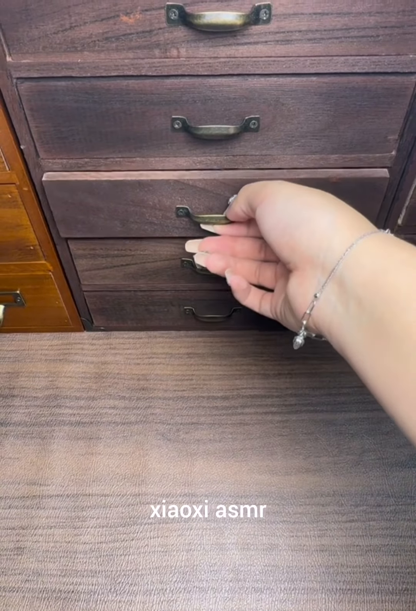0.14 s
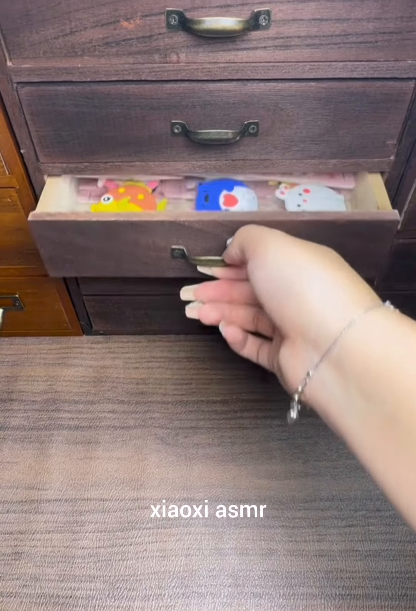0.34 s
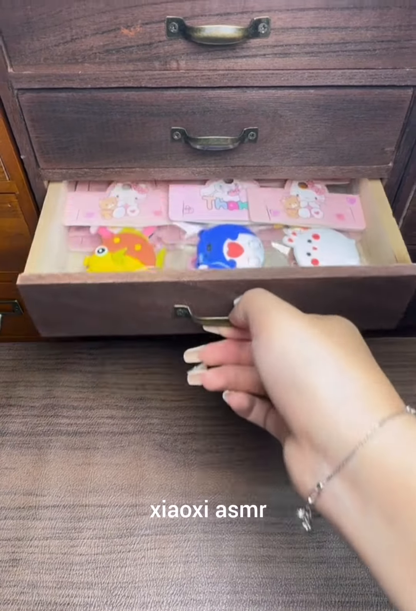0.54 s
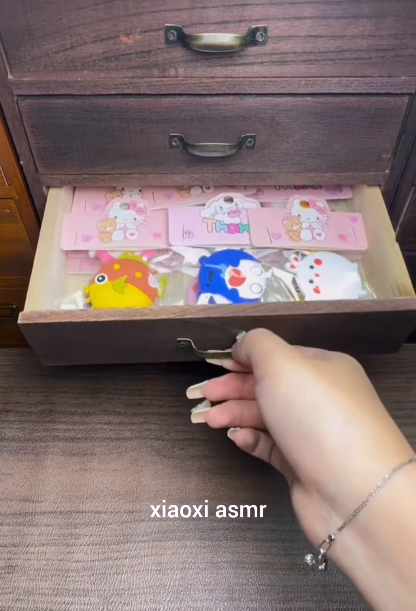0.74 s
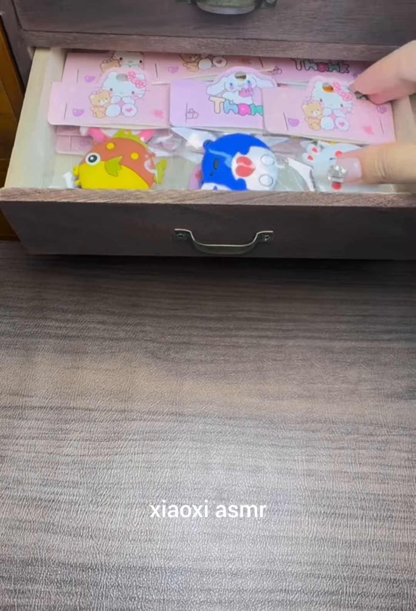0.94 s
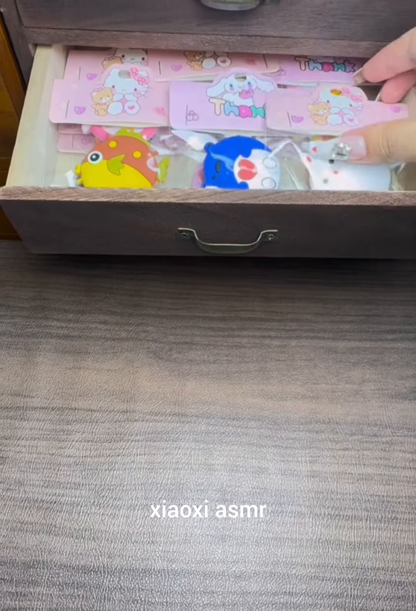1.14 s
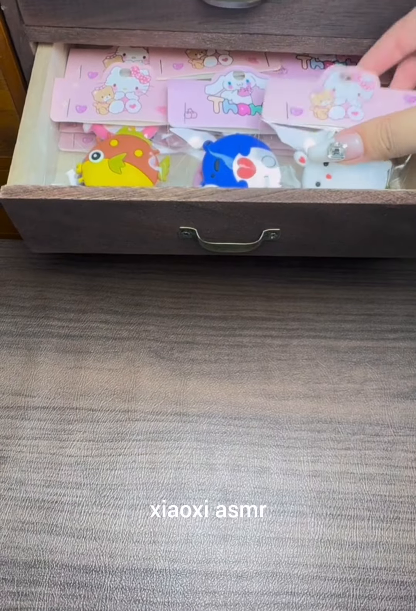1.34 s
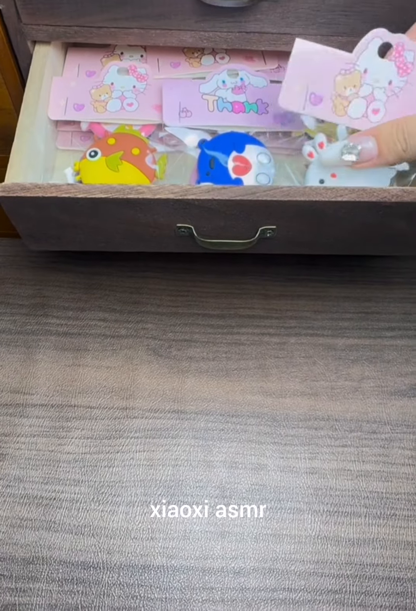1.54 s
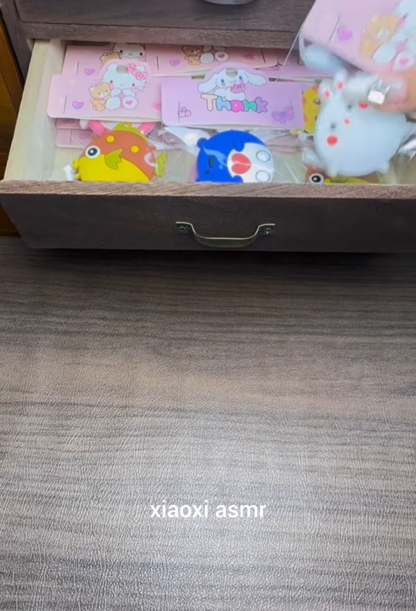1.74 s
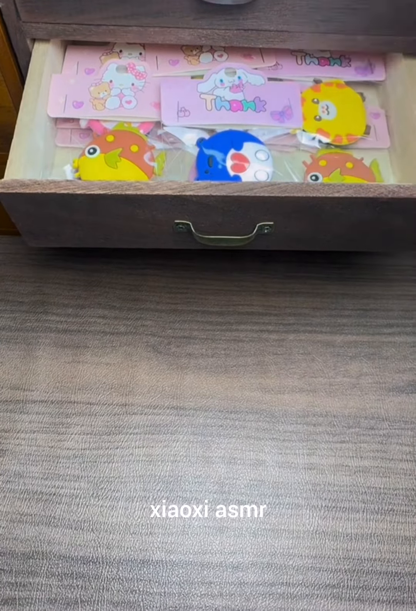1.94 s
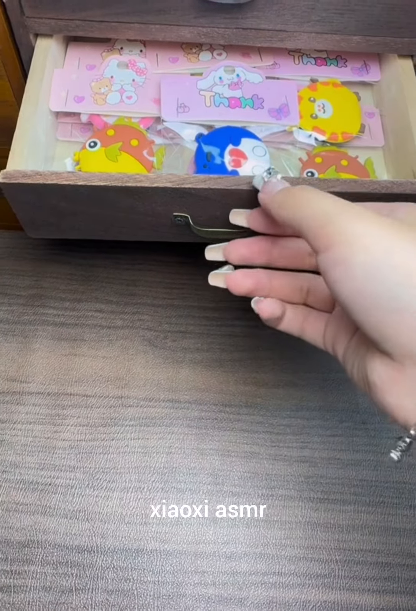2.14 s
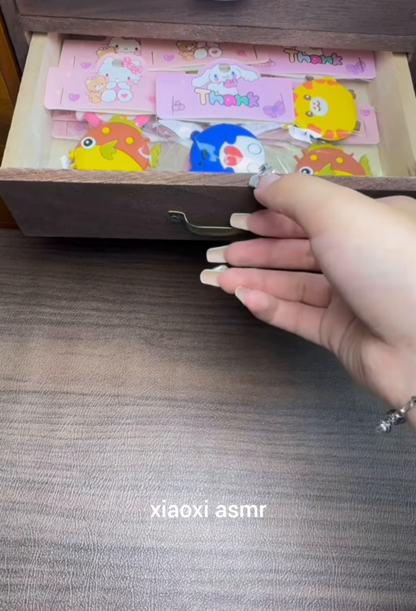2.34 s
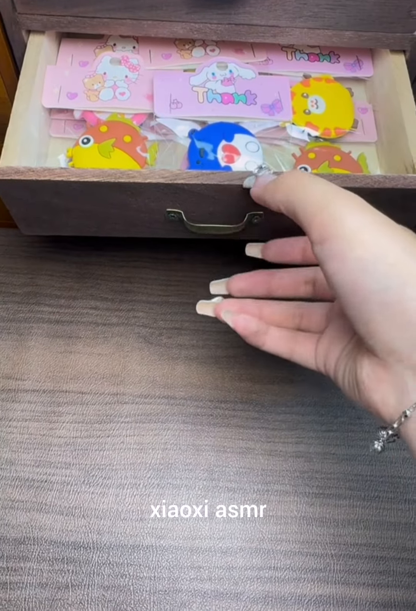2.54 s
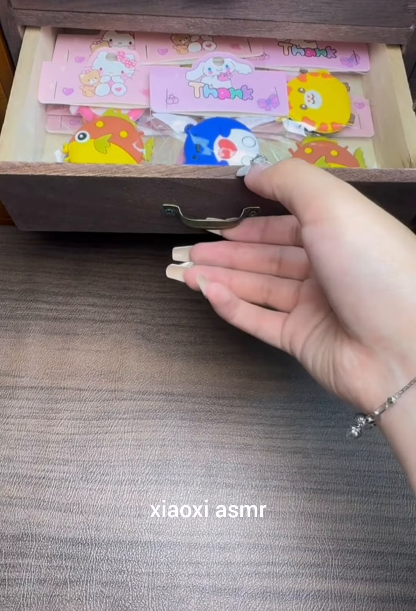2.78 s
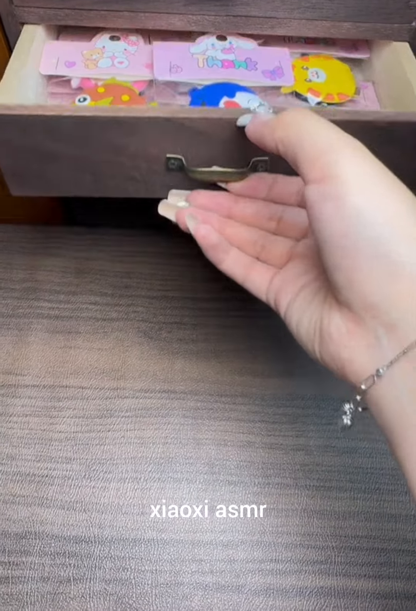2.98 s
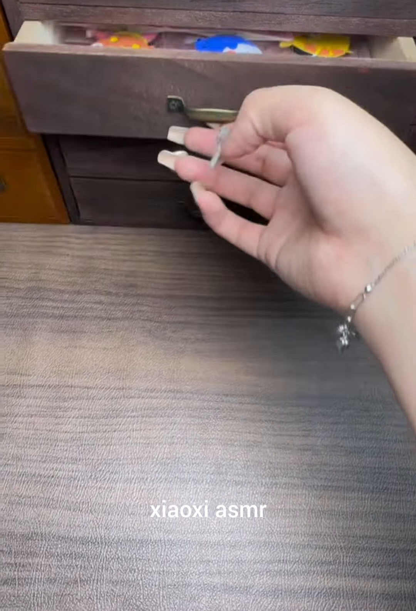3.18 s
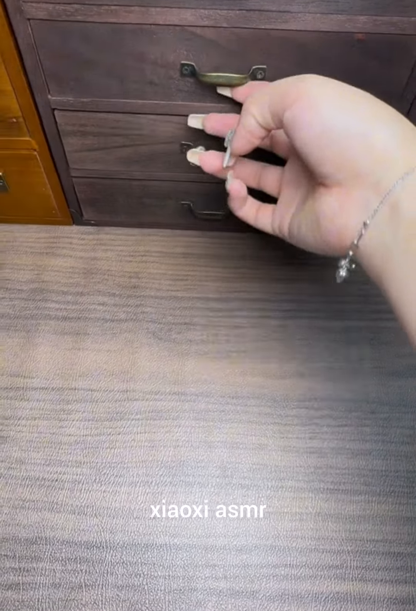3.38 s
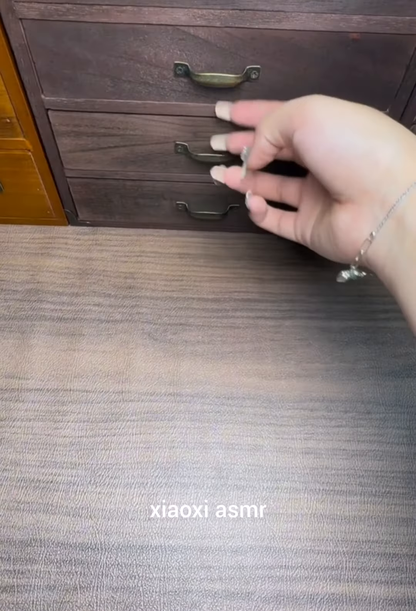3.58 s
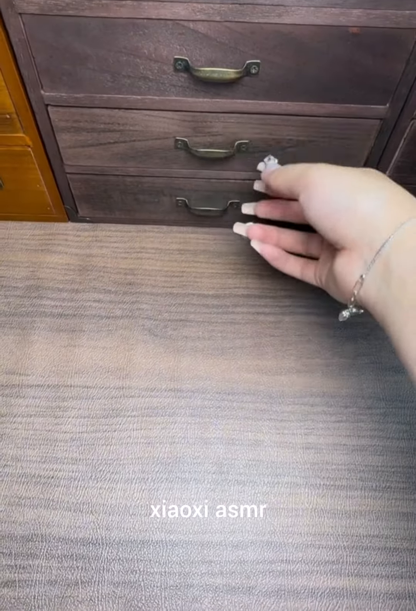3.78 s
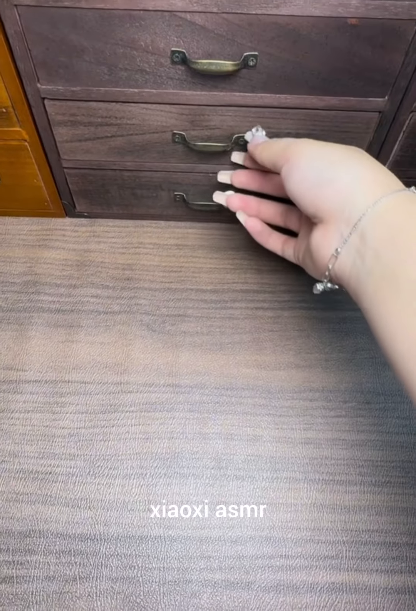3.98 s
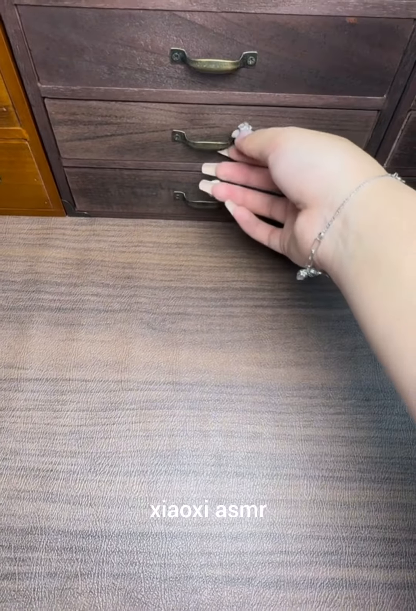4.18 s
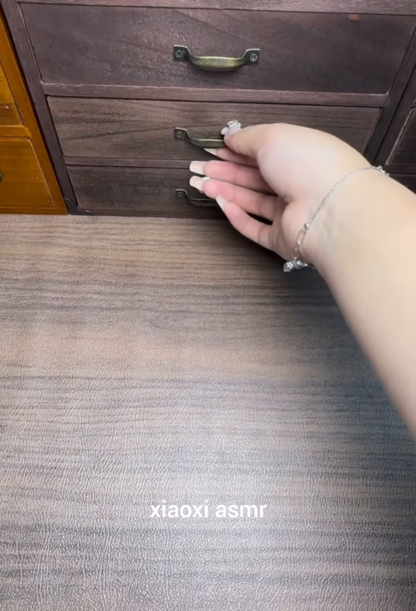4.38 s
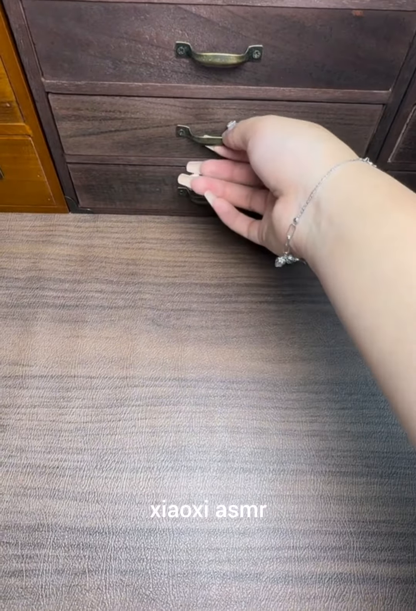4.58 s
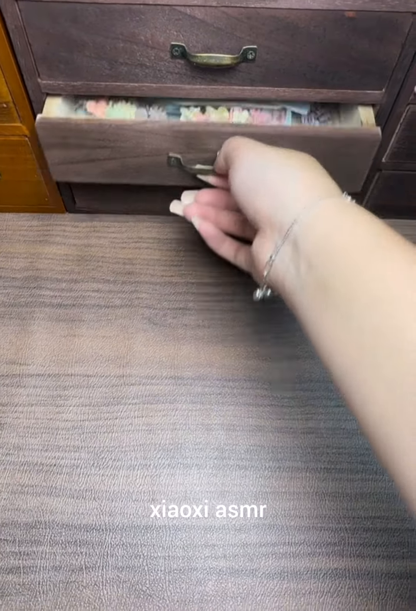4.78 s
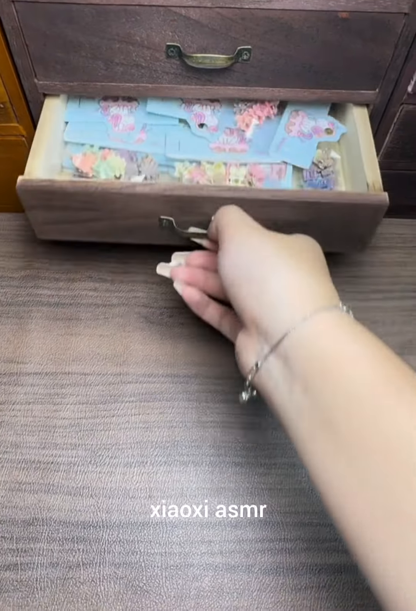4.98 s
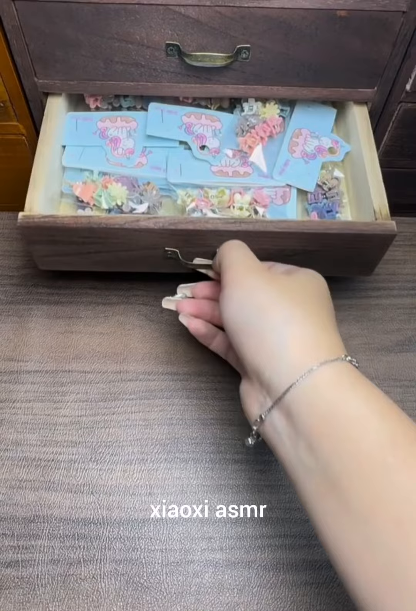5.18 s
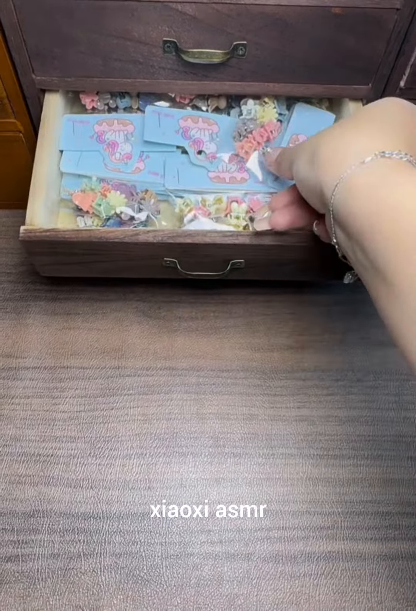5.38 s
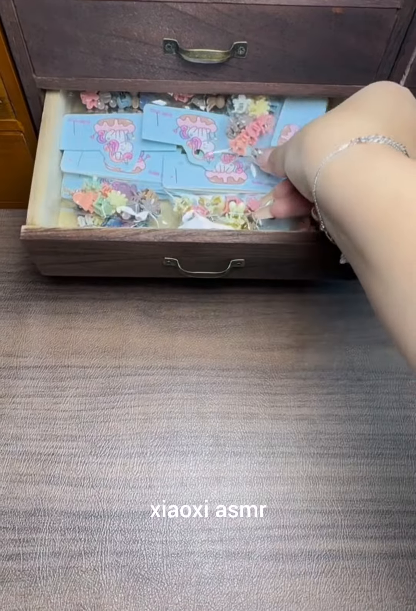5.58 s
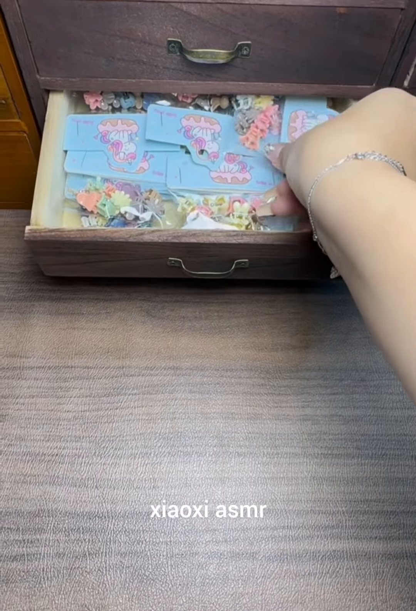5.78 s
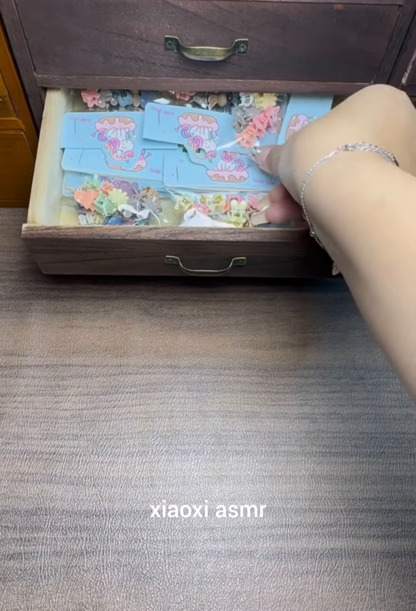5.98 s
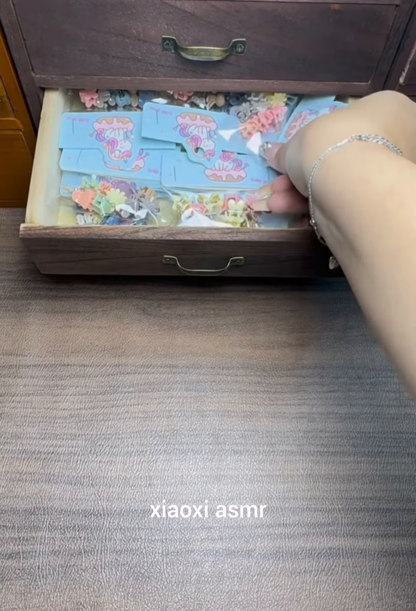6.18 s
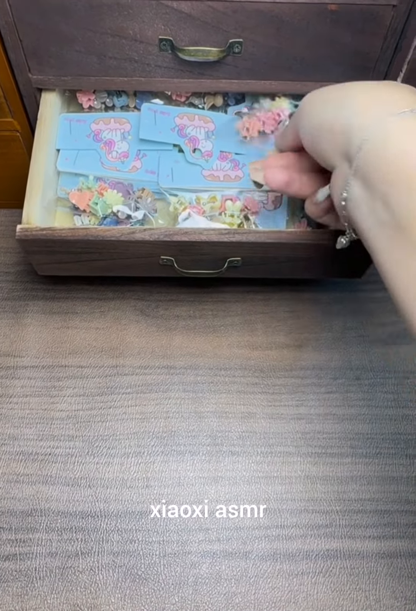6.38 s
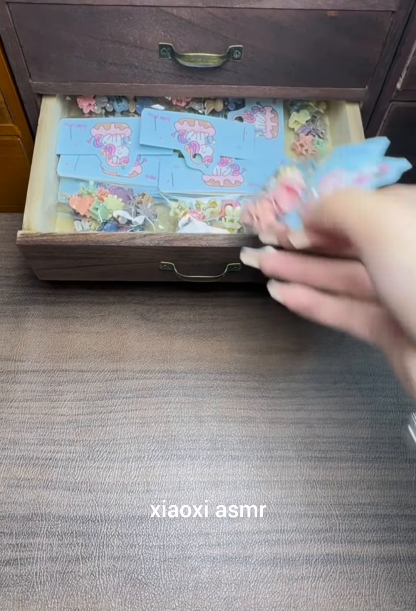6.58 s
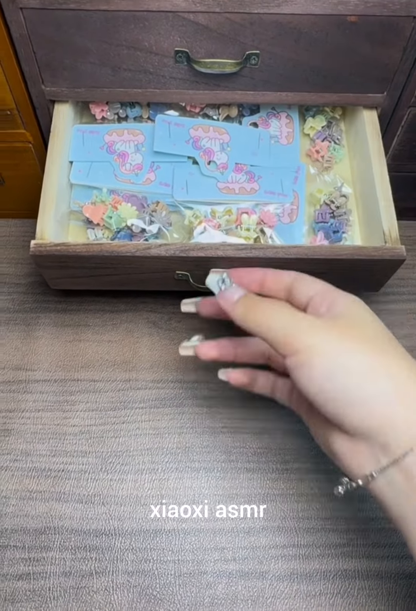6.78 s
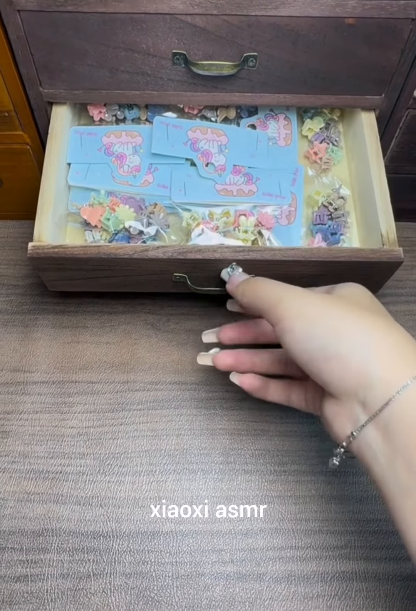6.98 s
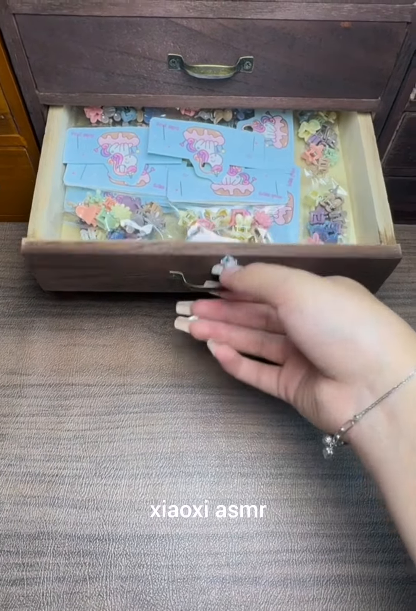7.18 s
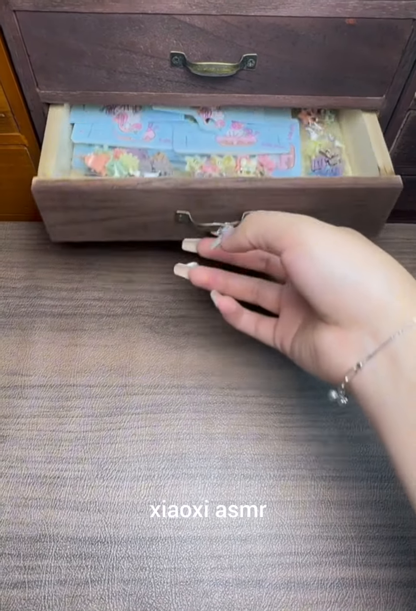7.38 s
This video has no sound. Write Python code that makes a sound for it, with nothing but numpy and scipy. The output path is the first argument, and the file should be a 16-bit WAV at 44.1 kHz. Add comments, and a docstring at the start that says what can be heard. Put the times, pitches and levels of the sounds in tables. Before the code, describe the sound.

A small wooden drawer scrapes open, plastic packets crinkle and snap under fingers, it scrapes shut with a knock, then another drawer repeats it.

```python
"""A small wooden drawer of a chest scrapes open close to a two-port microphone in a quiet room; fingers
knock it, pick through plastic packets that rustle, crinkle and snap, then brush the drawer front.
It scrapes shut, the chest settles, and a few small sounds follow. A drawer slides again, the packets
are picked through once more, and a last stroke ends it. Shaped noise makes the scraping and rustling,
resonances give the wood its notes, and brief cracks with fading tones make the snaps."""
import sys
import numpy as np
from scipy import signal
from scipy.fft import rfft, irfft, next_fast_len
from scipy.io import wavfile
from scipy.ndimage import uniform_filter1d, map_coordinates

SR = 44100
rng = np.random.default_rng(int(sys.argv[2]) if len(sys.argv) > 2 else 0)


def wav_out(sig):
    """Save sig, one row per channel (or a flat mono array), as 16-bit PCM at SR to the path in sys.argv[1]."""
    wavfile.write(sys.argv[1], SR, np.round(np.clip(np.atleast_2d(sig).T, -1, 1) * 32767).astype(np.int16))


N = 327663

# Fingers moving among the packets, one table a spell.
# Each row: time in seconds, rustle level in dB, hollow level in dB.
RUMMAGING = [
    [(0.78, -41.5, -50), (0.914, -43.5, -30), (1.048, -32.5, -28), (1.208, -47, -50), (1.458, -35.5, -46),
     (1.592, -68, -81), (1.91, -60.5, -79), (2.12, -74, -102)],
    [(2.15, -62, -71), (2.186, -68, -67), (2.306, -50, -48), (2.518, -66, -80), (2.66, -53, -53),
     (2.742, -57, -57), (2.84, -64, -55)],
    [(3.46, -64, -77), (3.588, -67, -81.5), (3.836, -69, -76.5), (3.96, -56.5, -79), (4.098, -67, -76),
     (4.29, -61.5, -84.5), (4.388, -64, -79.5), (4.45, -63, -73.5)],
    [(5.26, -40.5, -37), (5.868, -46.5, -49.5), (6.216, -42, -41.5), (6.292, -41.5, -40),
     (6.426, -57.5, -56), (6.702, -36, -61), (6.86, -54, -57), (6.97, -35.5, -35)],
]
# Notes of the wooden chest: rows 0-1 the carcass, 2-3 the drawer bottom, 4-5 its walls, the rest the front.
# Each row: pitch in Hz, width in Hz, strength in dB.
WOOD_NOTES = [(91.4, 35, -6.5), (155, 18, -13), (221, 63, 3), (298.5, 182, -0.5), (444.8, 66, 4.5),
              (596, 64, -8), (668.7, 78, -16.5), (857, 180, -14), (1077, 470, -19.5), (1710, 73, -45.5)]
# Notes of the packets in the open drawer. Each row: pitch in Hz, width in Hz, strength in dB.
HOLLOW_NOTES = [(675, 20, 3), (850, 200, 5), (1123, 110, 5.5), (1265, 150, 2.5), (1460, 1300, -13)]
# Tone of the plastic film. Each row: frequency in Hz, gain in dB.
FILM_TONE = [(940, -13), (1600, 1), (2310, 0), (3610, -4), (3890, -2.5), (4440, -4), (5840, 0.5),
             (8280, -2.5), (10600, -3), (15300, -8.5)]


def amp(db):
    """Decibels to a plain factor."""
    return 10 ** (np.asarray(db) / 20)


def unit(x):
    """Scale to an rms of 1."""
    return x / np.sqrt(np.mean(x ** 2) + 1e-20)


def noise():
    """White noise for mid and side."""
    return rng.standard_normal((2, N))


def along(points, hz):
    """Read a curve of (Hz, value) points on a log frequency axis."""
    f, v = np.transpose(points)
    return np.interp(np.log(hz + 1), np.log(f + 1), v)


def filtered(x, response):
    """Multiply the spectrum of x by a response that depends on frequency."""
    m = next_fast_len(N + SR // 2)
    return irfft(rfft(x, m) * response(np.fft.rfftfreq(m, 1 / SR)), m)[..., :N]


def modes(table):
    """Response of a set of resonances, which ring only after they are driven."""
    def response(f):
        total = 0
        for k, (centre, width, db) in enumerate(table):
            damping = 1j * f * width
            total = total + (-1) ** k * amp(db) * damping / (centre * centre - f * f + damping)
        return total
    return response


def squared(table):
    """Resonances applied twice: a steady drive leaves the valleys between the notes dark."""
    return lambda f: modes(table)(f) ** 2


def colour(points):
    """Response that follows a curve of gains in dB."""
    return lambda f: amp(along(points, f))


def played(force, response):
    """Send a force through a response scaled so that white noise would keep its rms."""
    norm = np.sqrt(np.mean(np.abs(response(np.linspace(1, SR / 2, 4000))) ** 2))
    return filtered(force, response) / norm


def wobble(rate):
    """A smooth random curve through `rate` chance values a second."""
    return map_coordinates(rng.standard_normal(int(N * rate / SR) + 4), [np.arange(N) * rate / SR])


def grit(rate, depth_db, patchy_db):
    """Rough noise of rms 1: surfaces catch by chance, and narrow bands of pitch come and go."""
    catch = wobble(rate)
    z = signal.stft(noise(), nperseg=512)[2]
    narrow, broad = rng.standard_normal((2, *z.shape))
    # smooth over pitch, then over time
    narrow = uniform_filter1d(uniform_filter1d(narrow, size=2, axis=1), size=12, axis=2)
    broad = uniform_filter1d(uniform_filter1d(broad, size=16, axis=1), size=8, axis=2)
    patches = amp(patchy_db * (unit(narrow) + 0.94 * unit(broad)))
    patchy = signal.istft(z * patches, nperseg=512)[1][:, :N]
    return unit(amp(depth_db * catch) * patchy)


def gains(tables):
    """One gain curve for each dB column, silent between the tables."""
    t = np.arange(N) / SR
    total = 0
    for s, *columns in map(np.transpose, tables):
        total = total + np.array([amp(np.interp(t, s, db, -200, -200)) for db in columns])
    return total


def room_tone():
    """The quiet air of the room is steady coloured noise, stronger in the side signal."""
    # Each row: frequency in Hz, gain in dB.
    air_tone = [(25, -14), (60, -1), (200, 0), (640, -5), (1800, -16), (4000, -18), (8000, -30),
                (15300, -21.5)]
    mid, side = amp(-61.5) * played(noise(), colour(air_tone))
    return np.array([mid, amp(5.0) * side])


def walls(x):
    """Chest front and table answer with a short dry tail of fading noise, apart for mid and side."""
    t = np.arange(SR // 4) / SR
    tail = rng.standard_normal((2, len(t))) * amp(-60 * t / 0.16)  # falls 60 dB in 0.16 s
    return signal.fftconvolve(x, tail / np.linalg.norm(tail[0]), axes=1)[:, :N]


def brushing():
    """Skin brushes the drawer front and its handle: gritty noise excites their notes."""
    # Each row: start in seconds, end in seconds, level in dB, panel note level in dB over it.
    strokes = [(2.12, 2.249, -36, -5.5), (2.245, 2.343, -41.5, -16), (2.315, 2.375, -25.5, -8.5),
               (2.337, 2.441, -42, -8), (2.47, 2.522, -67, -2), (2.613, 2.746, -55, 18.5)]
    # Drawer front and handle. Each row: pitch in Hz, width in Hz, strength in dB.
    front_notes = [(702, 36, 5.5), (1790, 95, -10), (2130, 210, -8), (2900, 570, 1.5), (4540, 490, -16),
                   (6000, 260, -13), (7160, 350, -9)]
    skin = np.zeros((2, N))
    for start, end, db, note_db in strokes:
        stroke = signal.windows.tukey(round((end - start) * SR), .6)
        skin[:, round(start * SR):][:, :len(stroke)] += amp([[db + note_db], [db]]) * stroke
    panel = played(skin[0] * grit(39.94, depth_db=-0.5, patchy_db=3), modes(front_notes[:1]))
    return panel + played(skin[1] * grit(100, depth_db=-1.0, patchy_db=3.5), modes(front_notes[1:]))


def jolts():
    """The drawer catches or a hand jolts the chest: shaking swells quickly, dies away and rings clearly."""
    # Each row: time in seconds, drawer bottom level in dB, carcass level in dB over it,
    # walls level in dB over it, length of the dying away in seconds.
    jolt_rows = [(0.212, -17.5, -12, -3.5, 0.06), (0.295, -17, -6, 2.5, 0.038),
                 (0.394, -13, -6.5, -4, 0.016), (0.473, -24, -17, 11, 0.051),
                 (0.556, -22.5, -0.5, -28, 0.033), (0.652, -34, -1.5, -18, 0.025),
                 (0.723, -19, -11.5, -11, 0.016), (0.749, -35.5, 2.5, -8, 0.014),
                 (0.887, -25.5, -42, -24, 0.022), (1.035, -43, -22, 9, 0.02), (1.149, -28, -7, -3, 0.02),
                 (1.211, -19.5, -4, -18, 0.02), (1.283, -32.5, -2, -27, 0.059),
                 (1.402, -21, -12, -34, 0.011), (1.569, -35.5, -5, -23, 0.032),
                 (2.158, -33.5, 0, -2, 0.025), (2.371, -34, -12, -11, 0.012), (2.471, -30, -8, -2, 0.014),
                 (2.502, -54, 3, -18, 0.016), (2.653, -55, 3, 11, 0.021), (2.854, -22.5, -10, 5, 0.023),
                 (2.939, -15.5, -4, -4, 0.06), (2.976, -19, 0, 1, 0.017), (3.067, -22, 10, 5, 0.013),
                 (3.119, -19, -5, 0, 0.025), (3.182, -21.5, -25, 8, 0.04), (3.312, -7, -12, -33, 0.016),
                 (3.344, -30.5, 1, -17.5, 0.0071), (3.506, -29.5, 0.5, -9, 0.029),
                 (3.532, -60, 15, -20, 0.02), (3.648, -56.5, 13, 1.5, 0.02), (3.782, -42, -5.5, -22, 0.02),
                 (3.866, -45, 8, -20, 0.02), (4.008, -47, 4.5, 1.5, 0.02), (4.424, -35.5, -16, 3.5, 0.018),
                 (4.563, -18, -7, -1, 0.02), (4.613, -23, 1, -19, 0.028), (4.678, -21, 2, 8, 0.037),
                 (4.761, -28, -18, 14, 0.025), (4.814, -17, -28, 6, 0.03), (4.857, -10.5, -22, -6, 0.033),
                 (4.925, -12, -34, -1, 0.026), (4.964, -13.5, -26, -15, 0.015), (5.163, -37, 2, 6, 0.039),
                 (5.312, -19, -1, -26, 0.015), (5.62, -28, -4, -13, 0.0085), (5.763, -36.5, -5, 10, 0.015),
                 (5.904, -28, -13, 0.5, 0.014), (5.982, -43.5, -8, 15.5, 0.01), (6.2, -40, -35, 9, 0.026),
                 (6.279, -27, -37, 4, 0.018), (6.343, -29, -28, 5.5, 0.02), (6.445, -27, -25, -4, 0.0085),
                 (6.757, -32, -13, -8, 0.014), (6.875, -33, -20, -12, 0.028), (7.206, -17, -11, -11, 0.06),
                 (7.223, -10, -19, -0.5, 0.013), (7.288, -24.5, 7, -12, 0.014),
                 (7.386, -16.5, -22, -10, 0.025), (7.429, -27, -24, -13, 0.02)]
    # Delays in seconds of the carcass, the drawer bottom and the walls.
    lag_s = .02, 0.0045, .001
    rise = 0.34  # rise time as a share of the length
    crest_db = 5.5  # taken off each level to get the strength of the shaking
    ring_db, ring_spread = 0, .04  # ring over shaking in dB; pitch scatter from jolt to jolt as a share
    t, force, ring = np.arange(N) / SR, np.zeros((3, N)), np.zeros(N)
    pitch_hz = np.array([WOOD_NOTES[0][0], WOOD_NOTES[2][0], WOOD_NOTES[4][0]])
    chances = rng.standard_normal((len(jolt_rows), 6, 1))
    for (s, db, carcass_db, walls_db, length), u in zip(jolt_rows, chances):
        near = slice(max(round((s - .2) * SR), 0), round((s + .4) * SR))
        late = (t[near] - s - np.array(lag_s)[:, None]) / max(length, .004)
        level = amp(db - crest_db + np.array([[carcass_db], [0], [walls_db]]))
        swell = level * np.exp(-np.where(late < 0, -late / rise, late))
        force[:, near] += swell
        hz = pitch_hz[:, None] * (1 + ring_spread * u[:3])
        ring[near] += np.sum(swell * np.sin(2 * np.pi * (hz * (t[near] - s) + u[3:])), axis=0)
    return force, amp(ring_db) * np.array([ring, np.roll(ring, 90)])  # the side comes about 2 ms later


def shaking(card):
    """Jolts and the rummaging hand shake carcass, drawer bottom and walls, which resonate."""
    # How hard the hand shakes carcass, drawer bottom and walls, in dB over the hollow level.
    hand_db = -15, -8, -7
    force, ring = jolts()
    carcass, bottom, sides = force + amp(hand_db)[:, None] * card
    return (ring + played(carcass * noise(), squared(WOOD_NOTES[:2]))
            + played(bottom * noise(), squared(WOOD_NOTES[2:4]))
            + played(sides * noise(), modes(WOOD_NOTES[3:6])))


def rubbing():
    """Fingers nudge the chest, stir the packets, make the film rustle and brush the drawer front."""
    rustle, card = gains(RUMMAGING)
    stirred = played(card * grit(120, depth_db=5.5, patchy_db=6.5), modes(HOLLOW_NOTES))
    rustling = played(rustle * grit(250, depth_db=3.5, patchy_db=2.5), colour(FILM_TONE))
    return shaking(card) + stirred + rustling + brushing()


def crinkles():
    """Stirred film gives small snaps at chance moments, whose strength follows the rustle."""
    tries_per_s, quietest_rustle_db = 30, -58  # film stirred more gently than this does not snap
    over_rustle_db, spread_db = 7.5, 5.5
    u = rng.random((round(tries_per_s * N / SR), 7))
    s = .03 + u[:, 0] * (N / SR - .03)
    rustle_db = 20 * np.log10(gains(RUMMAGING)[0][(s * SR).astype(int)])
    db = rustle_db + over_rustle_db + spread_db * (2 * u[:, 1] - 1)
    tick_db, tick_hz = -12 * u[:, 2], 1500 + 1200 * u[:, 6]
    hollow_db, hollow_hz = -16 * u[:, 3], 750 + 500 * u[:, 4]
    length = 0.00045 + 0.0016 * u[:, 5]
    rows = np.transpose([s, db, tick_db, tick_hz, hollow_db, hollow_hz, length, 0 * s])
    return rows[rustle_db > quietest_rustle_db]


def snaps():
    """Film cracks sharply and dies away, with a tick and a hollow note at their own pitches."""
    # Film and fingernails; the loop trims the levels. Each row: time in seconds, crack level in dB,
    # tick level in dB over it, tick pitch in Hz, hollow level in dB over the crack,
    # hollow pitch in Hz, length in seconds, lean in dB (positive is to the left).
    snap_rows = [(0.7177, -13, -11, 3200, -13, 830, 0.0011, -2),
                 (0.872, -18.5, 2.5, 1520, -6.5, 800, 0.001, 0.0),
                 (0.977, -10.5, -7, 1580, -16, 1300, 0.0016, -1.5),
                 (0.987, -17, 0, 1850, -7, 1090, 0.0013, -3),
                 (1.097, -11.5, -25, 1500, 1.5, 1063, 0.001, 0.5),
                 (1.156, -9, -15, 2430, -1, 887, 0.0017, 3), (1.176, -15, -8, 1560, -13, 1040, 0.0023, 0.0),
                 (1.213, -15.5, 5, 2440, -1, 875, 0.002, 3),
                 (1.2207, -10.5, -6, 2480, -5.5, 850, 0.0012, 2),
                 (1.27, -4, -13, 1740, -10.5, 824, 0.0013, -0.5),
                 (1.3109, -19.5, 0.5, 2100, -11, 794, 0.0012, 3),
                 (1.3428, -11, -24, 1830, -5, 885, 0.0012, 5),
                 (1.3917, -13.5, -11, 1840, -3, 863, 0.00091, 0.5),
                 (1.3972, -13, -16, 2130, -10, 990, 0.0028, 0.0),
                 (1.4258, -29, -4, 1910, 3, 890, 0.0014, 1.0),
                 (1.4354, -27.5, 7, 1510, 12, 1030, 0.00073, -3),
                 (1.479, -31, 11, 2130, 14, 1060, 0.00095, 2),
                 (1.5509, -25.5, 1, 2080, -4, 859, 0.001, -0.5),
                 (1.5678, -10, -4, 2070, -1.5, 890, 0.00077, 0.5),
                 (1.5876, -22, 3, 1570, 2, 820, 0.0011, -5), (1.6157, -9, -12, 2230, -17, 844, 0.0014, 0.5),
                 (1.6394, -20, 6.5, 2170, -12, 856, 0.00088, -1.0),
                 (1.7403, -14, 7, 2130, -5.5, 1350, 0.00078, -0.5),
                 (1.8213, -26.5, 2, 1840, -5, 1080, 0.0012, 0.5), (1.8304, -35, 2, 1570, 4, 820, 0.0011, 1),
                 (1.8623, -16.5, -15, 2570, -28, 805, 0.0012, 0.5),
                 (1.981, -24, -27, 3200, -22, 1090, 0.0015, 1.5),
                 (2.14, -6.5, -14, 2940, -9.5, 683, 0.0018, 0),
                 (2.3134, -21, -9, 2240, -13, 686, 0.00075, -1),
                 (2.3475, -8, -22, 2880, -15.5, 850, 0.0011, 1.0),
                 (2.355, -10, -5, 2780, -29, 700, 0.00099, 7),
                 (2.5594, -31, -4, 2860, -5.5, 830, 0.0018, -0.5),
                 (2.634, -27.5, -17, 2400, -5, 690, 0.0027, -1.0),
                 (3.184, -18, -1, 1800, -4, 930, 0.0021, -1.0), (3.3132, -21, 4, 1680, 6, 867, 0.0013, -4),
                 (3.9998, -22.5, -4, 2750, -24, 1200, 0.0021, 1.0),
                 (4.0805, -51.5, -9, 1880, 7, 720, 0.0023, -4),
                 (4.407, -11.5, 0, 1680, -12, 724, 0.0021, 0.5),
                 (4.4895, -31.5, -5, 1740, -14, 716, 0.0018, 0.5),
                 (4.5201, -35, 1, 1710, 0, 692, 0.0014, -1.0), (5.301, -21, 6, 2100, 4, 980, 0.0007, 0.5),
                 (5.3067, -17.5, -17, 1400, 6, 910, 0.00079, -1.0),
                 (5.3095, -10, -18, 3090, -7, 870, 0.0018, -0.5),
                 (5.4794, -33, -16, 1630, 9, 895, 0.0011, 0.5), (5.5312, -7, -9, 1524, -17, 930, 0.002, 3),
                 (5.7212, -4.5, -13, 2230, -11, 1290, 0.001, 0.5),
                 (5.76, -33.5, 7, 2290, 15.5, 910, 0.00081, 0.0),
                 (5.7825, -19, -3, 1600, -7, 1350, 0.0014, 2),
                 (5.8064, -29.5, -14, 1400, 4.5, 1340, 0.0018, 1.0),
                 (5.889, -29, -18, 2310, 6, 890, 0.0015, 1.5),
                 (5.9105, -24, -25, 1420, 3, 885, 0.0012, 0.5),
                 (5.946, -14, 2, 1530, -4.5, 740, 0.00047, 0.5),
                 (5.9626, -4, -31, 1600, -23, 855, 0.00059, -1),
                 (6.0194, -6.5, -16, 1610, -24.5, 810, 0.0013, 2),
                 (6.0586, -14, -25, 2300, -30, 1250, 0.0012, 3),
                 (6.0676, -11.5, -5, 2360, -7, 1330, 0.00047, 0.5),
                 (6.089, -6, -6.5, 2350, -23, 1060, 0.00084, 0.0),
                 (6.1964, -10.5, -15, 2390, -35, 1020, 0.0023, 0.0),
                 (6.271, -14, -26, 1680, -9.5, 824, 0.00095, 1),
                 (6.2944, -10, -24, 2340, -20, 1260, 0.0011, 0.5),
                 (6.331, -14.5, -2, 2030, -11, 870, 0.00095, 3),
                 (6.345, -8, -10, 2340, -13, 807, 0.002, -3),
                 (6.358, -10, -8, 2180, -23, 1110, 0.0017, -2.0),
                 (6.3777, -12, -11, 2090, -13, 826, 0.0014, 0.0),
                 (6.3919, -10.5, -3, 2300, -17, 990, 0.0012, -1),
                 (6.438, -9.5, -22, 2330, -12.5, 860, 0.0015, -0.5),
                 (6.445, -21, 2, 2290, -15, 820, 0.0013, -8),
                 (6.6808, -26, -13, 2770, -5, 1130, 0.0018, -1.0),
                 (6.7064, -8, -12, 2400, -19, 1280, 0.0016, -1),
                 (6.7496, -18.5, -2, 1880, 10, 793, 0.0011, -2.5),
                 (6.8638, -6, -9, 1600, -5, 775, 0.0016, 1), (7.023, -22.5, -4, 2660, -3, 805, 0.0012, 0.0),
                 (7.1792, -23, -9, 2460, -3, 1095, 0.0042, 0.0),
                 (7.2436, -20, -7, 2600, -21, 689, 0.0041, -0.5)]
    attack_s = .0005
    press, notes, lean = np.zeros((3, N + SR)), np.zeros((2, N + SR)), np.zeros(N + SR)
    lead = SR // 50  # samples ahead of the crack
    t = np.arange(-lead, SR // 20) / SR
    for s, db, nail_db, nail_hz, hollow_db, hollow_hz, length, pan_db in [*snap_rows, *crinkles()]:
        i, u = round(s * SR) - lead, np.maximum(t, 0) / max(length, .0004)
        near = slice(i, i + len(t))
        crack = (t >= 0) * (1 - np.exp(-t.clip(0) / attack_s)) * np.exp(-u / 1.005)
        # a weak skirt of noise around the crack: a short rise, a slower fading
        shape = crack + amp(-20.5) * np.exp(-np.abs(t) / np.where(t < 0, .004, .009))
        press[:, near] += amp([[db + 0.5], [db + nail_db - 3.5], [db + hollow_db + 3.5]]) * shape
        lean[near] += amp(db - 1) * shape * np.tanh(pan_db * np.log(10) / 40)
        tick_phase, hollow_phase = rng.uniform(0, 2 * np.pi, (2, 2, 1))
        tick = np.sin(2 * np.pi * nail_hz * t + tick_phase)
        notes[:, near] += amp(db + nail_db - 5.0) * u * np.exp(1 - u) * tick
        hollow = np.sin(2 * np.pi * hollow_hz * t + hollow_phase)
        notes[:, near] += amp(db + hollow_db - 3.5) * u / 2 * np.exp(1 - u / 2) * hollow
    return press[:, :N], notes[:, :N], lean[:N]


def crushes():
    """Film crushed or brushed by a finger presses for a while, swelling and fading smoothly."""
    # Each row: start in seconds, end in seconds, crackle level in dB, nail level in dB, hollow level in dB.
    crush_rows = [(0.825, 0.944, -55.5, -47, -35), (1.043, 1.114, -23, -51, -19),
                  (1.121, 1.162, -28.5, -48, -14.5), (1.37, 1.426, -28.5, -35.5, -28),
                  (2.15, 2.238, -42, -71, -66), (2.436, 2.508, -68.5, -49.5, -48),
                  (2.55, 2.694, -46, -47, -55), (2.817, 2.872, -40, -38, -38),
                  (3.475, 3.527, -39, -46.5, -34.5), (3.603, 3.667, -59.5, -80.5, -76),
                  (4.006, 4.12, -65, -54.5, -67.5), (4.41, 4.49, -52.5, -46.5, -51),
                  (5.28, 5.309, -62, -53, -36), (5.338, 5.455, -42.5, -50, -30),
                  (5.488, 5.539, -34.5, -43, -36), (5.516, 5.562, -24, -49.5, -28),
                  (5.588, 5.663, -35, -38.5, -34), (5.664, 5.794, -46.5, -45, -47),
                  (5.77, 5.807, -56, -51, -50), (5.888, 6.016, -51, -38.5, -37),
                  (6.082, 6.175, -35.5, -39.5, -39), (6.26, 6.358, -26.5, -47, -38),
                  (6.435, 6.47, -34, -56, -38), (6.756, 6.764, -63, -29, -21), (6.869, 6.89, -14, -22, -30)]
    press = np.zeros((3, N + SR))
    for start, end, *dbs in crush_rows:
        i, shape = round(start * SR), signal.windows.tukey(round((end - start) * SR), .7)
        press[:, i:i + len(shape)] += amp(dbs)[:, None] * shape
    return press[:, :N]


def packets():
    """Snaps and crushes drive the film, the card under a fingernail and the hollow of the drawer."""
    # Stiff card under a fingernail. Each row: pitch in Hz, width in Hz, strength in dB.
    nail_notes = [(1560, 200, -2), (2280, 130, 3.5), (3500, 870, -8.5), (4370, 900, -15.5)]
    (snap, snap_nail, snap_hollow), notes, lean = snaps()
    crackle, crush_nail, crush_hollow = crushes()
    force = np.sign(noise())  # random signs of equal strength
    nail, hollow = snap_nail + crush_nail, snap_hollow + crush_hollow
    film = (played(snap * force, colour(FILM_TONE))
            + played(crackle * grit(370, depth_db=0.0, patchy_db=-3.5), colour(FILM_TONE))
            + played(nail * grit(300, depth_db=0.5, patchy_db=1.5), modes(nail_notes))
            + played(hollow * grit(200, depth_db=2.5, patchy_db=3.0), modes(HOLLOW_NOTES)) + notes)
    return film, played(lean * force[0], colour(FILM_TONE))


def knocks():
    """A blow on the wood sounds hard and even for a moment, then drops abruptly to a weak ring."""
    # Levels are trimmed in the loop. Each row: time in seconds, blow level in dB,
    # hardness in dB, thump in dB, contact time in seconds.
    blows = [(0.717, -15.5, -25, -29, 0.015), (0.873, -32, -11, -28, 0.0065), (1.214, -29.5, 13.5, 6, 0.01),
             (1.273, -19.5, -6, -3.5, 0.006), (2.137, -26.5, 17, -26, 0.0066), (2.351, -38, -9, -41, 0.016),
             (2.463, -42, 15, -26, 0.018), (2.845, -7.5, 4.5, -23, 0.013), (2.957, -26, 8, 10, 0.011),
             (2.98, -29.5, 13, 16.5, 0.015), (3.059, -25, 7, 11, 0.016), (3.181, -9, 7, -15, 0.012),
             (3.19, -6.5, -17, -28, 0.0083), (3.314, -5.5, -5, -11, 0.0081), (3.504, -42, -1, 7, 0.028),
             (3.778, -42.5, -16, 4.5, 0.0089), (5.318, -28, -17, 5, 0.0096), (5.758, -38, 3, -22, 0.015),
             (5.91, -36, 18.5, -25, 0.0092), (6.192, -26, -4, -41, 0.014), (6.274, -29, -3, -54, 0.017),
             (7.229, -8.5, -1, -32, 0.013)]
    shake, heavy = np.zeros(N + SR), np.zeros(N)

    def wave(part, t):
        """Sum the notes of a part, each a little off pitch by chance."""
        return sum(amp(db) * np.sin(2 * np.pi * hz * t * rng.normal(1, 0.084)) for hz, _, db in part)

    for s, db, hard_db, thump_db, contact in blows:
        i, t = round(s * SR), np.arange(round(contact * SR)) / SR
        touch = amp(db - 7.0) * signal.windows.tukey(len(t), .4)
        panels = wave(WOOD_NOTES[2:6], t) + amp(hard_db + 13.0) * wave(WOOD_NOTES[6:], t)
        shake[i:][:len(t)] += touch * panels
        heavy[i] = amp(db + thump_db + 54)  # a one-sample push on the carcass
    weak_ring = amp(-24.5) * filtered(shake[:N], modes(WOOD_NOTES[2:]))
    mid = shake[:N] + weak_ring + filtered(heavy, modes(WOOD_NOTES[:2]))
    return np.array([mid, np.roll(mid, 90)])  # the side comes about 2 ms later


def sliding():
    """Wood sticks and slips, driving each part of the drawer, and the dry surfaces hiss."""
    # One table a stroke; the third is the chest settling after the drawer shuts. Each row: time in seconds,
    # dry hiss level in dB, carcass level in dB, drawer level in dB, front panel level in dB.
    strokes = [
        [(0, -31, -38, -39, -33), (.162, -30.5, -28, -29.5, -39), (.28, -23.5, -35, -30, -24),
         (.358, -25, -35, -25, -22.5), (.42, -21, -38, -21, -22.5), (.602, -33, -33, -38, -35),
         (.715, -34, -37, -33.5, -41.5), (.76, -49, -37, -48, -66), (.8, -60, -58, -60, -46)],
        [(2.87, -46.5, -40, -37, -54), (2.902, -35.5, -47, -34, -42.5), (3.014, -26, -36, -31, -23),
         (3.082, -25.5, -30, -30.5, -29), (3.164, -25, -40, -28, -29), (3.19, -27.5, -38, -30, -35),
         (3.2, -46, -38, -27, -43), (3.27, -39.5, -36, -39.5, -43), (3.318, -29, -36, -40, -50),
         (3.328, -56, -40, -42, -60)],
        [(3.33, -72, -33, -43.5, -64), (3.394, -78, -40, -49, -68), (3.48, -62, -46, -51, -81)],
        [(4.45, -60, -56, -48, -70), (4.52, -50.5, -40, -47, -53), (4.575, -32.5, -45, -38, -46),
         (4.66, -32, -45, -34.5, -44), (4.742, -25, -50, -34, -32), (4.82, -23.5, -48, -34.5, -30),
         (4.908, -28, -47, -40, -33), (5.01, -35, -42, -32.5, -38), (5.122, -30, -34, -31.5, -45),
         (5.24, -45, -61, -51, -53), (5.27, -74, -57, -53, -65)],
        [(6.96, -39, -53, -44, -46), (7.01, -46, -58, -52, -53), (7.048, -26, -61, -45, -34.5),
         (7.11, -28, -60, -46.5, -30.5), (7.154, -38.5, -59.5, -37, -30), (7.224, -23.5, -41, -33, -31.5),
         (7.27, -36.5, -46, -34, -38), (7.344, -31.5, -47, -30, -35), (7.43, -25.5, -43, -32, -36)],
    ]
    # Tone of the dry hiss. Each row: frequency in Hz, gain in dB.
    hiss_tone = [(710, -14.5), (1200, -3), (1440, -7), (1900, -2), (2480, -8), (2840, -5.5), (3910, -12),
                 (5740, -9), (8980, -10.5), (15300, -15)]
    # Brightness of each stroke: top treble of the scraping, in dB over its hiss.
    sheen_db = -11, -3.5, -12, -11.5, -9
    # Tone of that treble. Each row: frequency in Hz, gain in dB.
    sheen_tone = [(6000, -21.5), (10000, -1), (15300, -1.5)]
    wander_db, wander_per_s = 5, 14  # each part is gripped harder and softer by chance
    hiss, carcass, drawer, front = gains(strokes)
    drives = carcass, drawer, drawer * amp(-4.5), front  # carcass, drawer bottom, drawer walls, front
    parts = WOOD_NOTES[:2], WOOD_NOTES[2:4], WOOD_NOTES[4:6], WOOD_NOTES[6:]
    body = np.zeros((2, N))
    for drive, part in zip(drives, parts):
        grip = amp(wander_db * wobble(wander_per_s))
        body += played(drive * grip * noise(), squared(part))
    sheen = sum(amp(db) * gains([stroke])[0] for db, stroke in zip(sheen_db, strokes))
    body += played(sheen * noise(), colour(sheen_tone))
    return body + played(hiss * grit(270, depth_db=0.53, patchy_db=2.0), colour(hiss_tone))


def scene():
    """Mid and side make the two ports; the side of the near sources is shaped by pitch, the air's is not."""
    # Width of the near sources. Each row: frequency in Hz, side gain in dB.
    side_tone = [(40, -24), (90, -29), (200, -31), (330, -21), (500, -15), (770, -10), (1250, -14),
                 (1850, -15), (2600, -3), (3500, -3), (4100, -8), (4900, -3), (5700, -8), (7500, -4),
                 (10000, -8), (15000, -6)]
    film, lean = packets()
    hits = film + knocks()
    mid, side = sliding() + rubbing() + hits + amp(-13.0) * walls(hits)
    air_mid, air_side = room_tone()
    mid = mid + air_mid
    side = filtered(side, colour(side_tone)) + lean + air_side
    return np.array([mid + side, mid - side])


def record(dry):
    """Peaks are rounded off, the microphone fades in deep bass and top treble, and a band limit cuts."""
    # Microphone. Each row: frequency in Hz, gain in dB.
    mic_tone = [(25, -3.5), (55, -1.5), (15300, -1), (15700, -16), (16600, -37.5)]
    top_hz = 16650  # nothing is kept from here up
    soft = dry / (1 + np.abs(dry / .97) ** 4) ** (1 / 4)
    return filtered(soft, lambda hz: amp(along(mic_tone, hz)) * (hz < top_hz))


dry = scene()
out = record(dry)
wav_out(out)
```